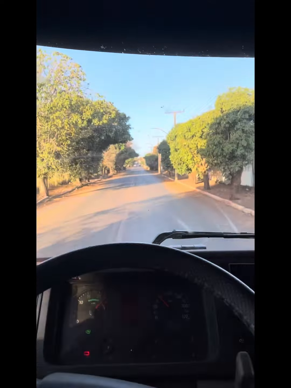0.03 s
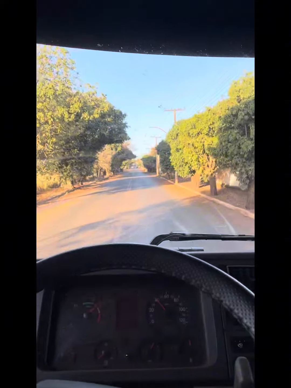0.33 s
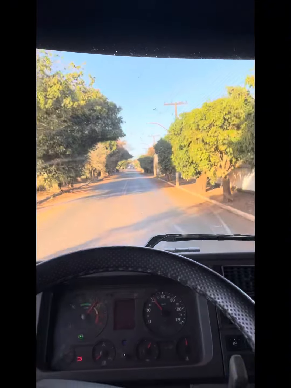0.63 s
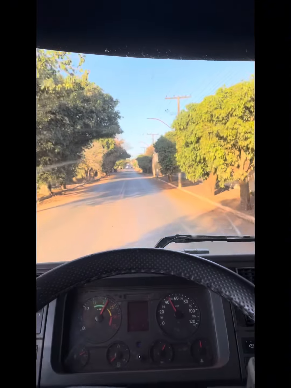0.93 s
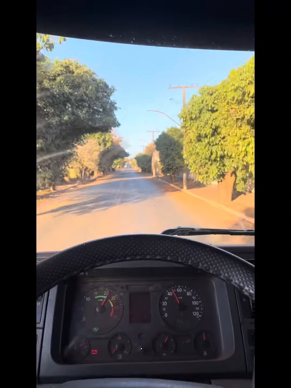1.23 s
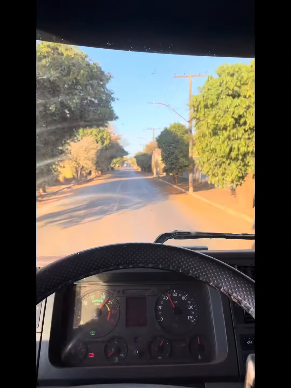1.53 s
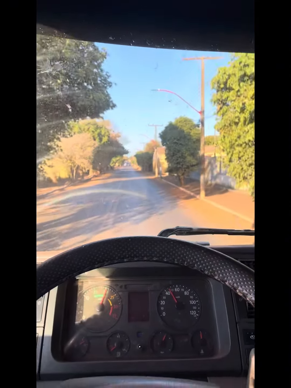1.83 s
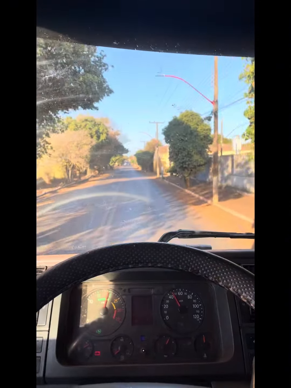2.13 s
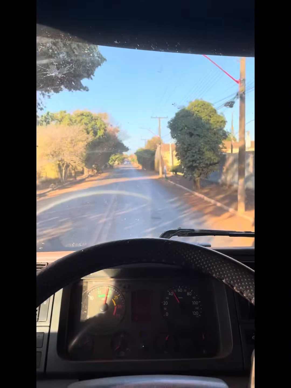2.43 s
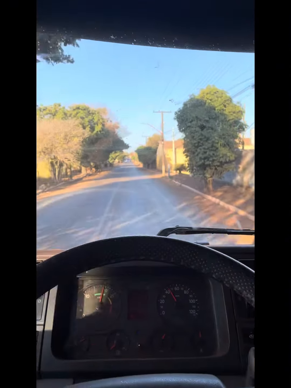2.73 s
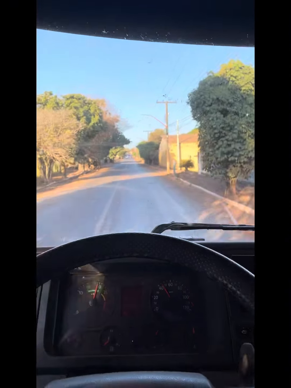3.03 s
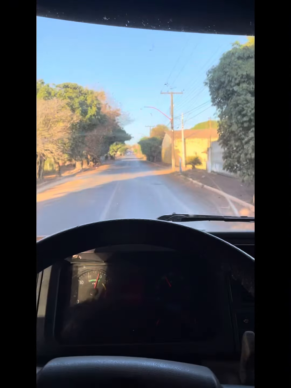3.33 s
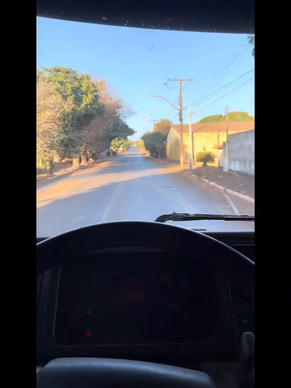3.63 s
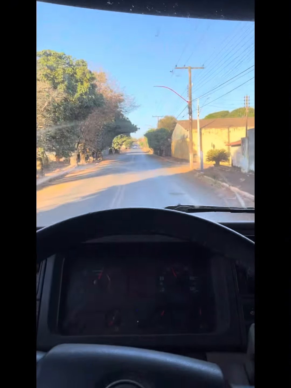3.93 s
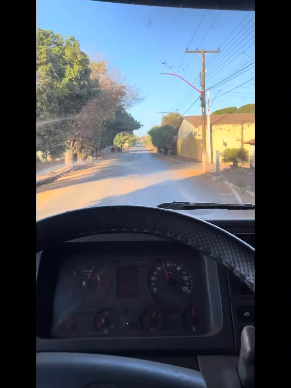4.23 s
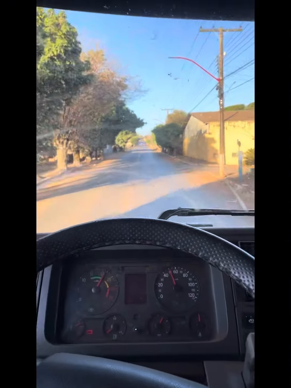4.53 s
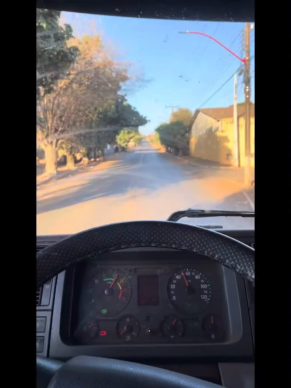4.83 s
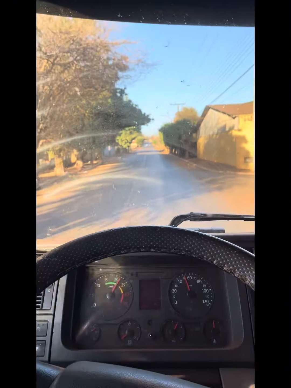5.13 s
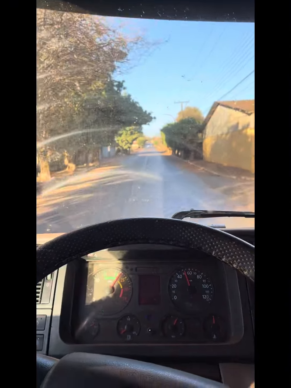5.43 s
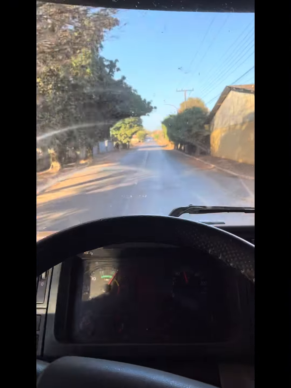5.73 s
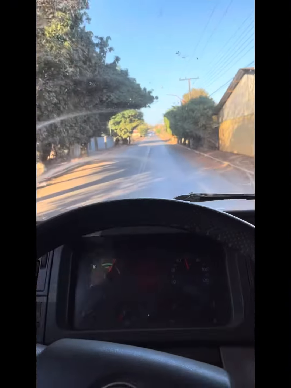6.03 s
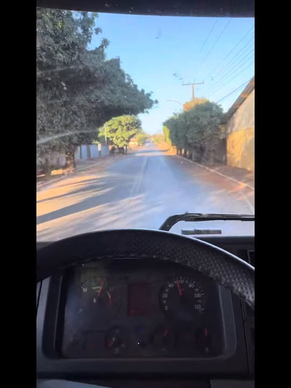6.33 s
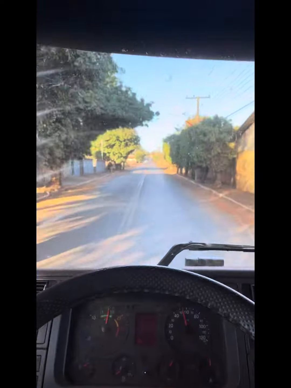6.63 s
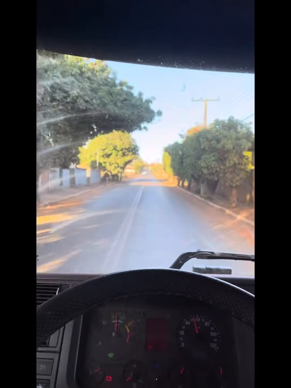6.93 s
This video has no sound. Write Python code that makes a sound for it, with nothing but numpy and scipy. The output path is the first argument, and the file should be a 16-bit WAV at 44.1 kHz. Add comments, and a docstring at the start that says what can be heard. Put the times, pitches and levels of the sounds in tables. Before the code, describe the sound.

Inside a moving truck's cab, a loud diesel drone sits over low road rumble. After a quick rev and a hiss from an air valve, the engine digs in, growling and slowly rising in pitch while panels buzz. Bumps thud through the floor, the hardest just as the driver eases off. The engine coasts down, then picks up again at a lower pitch. Faint trim squeaks and a thin turbo whistle come and go.

```python
"""A diesel drone over road rumble, heard from the driver's seat of a six-cylinder truck. The engine is blipped
through a gear change, pulls hard for over three seconds, coasts and pulls again in a higher gear. Periodic
firing makes the exhaust boom and growl through the cab's air resonances; combustion rattles the block, intake
air rushes and the turbo whistles faintly. Rubbing trim squeaks, air valves spit, bumps jolt the floor, the
driveline clunks at a gear change, and short buzzing rattles come during the pull and as the throttle lifts."""
import sys
import numpy as np
from scipy import signal
from scipy.fft import rfft, irfft
from scipy.io import wavfile
from scipy.ndimage import uniform_filter1d, minimum_filter1d

SR = 44100
rng = np.random.default_rng(int(sys.argv[2]) if len(sys.argv) > 2 else 0)


def master_out(mix):
    """Clip the mix to full scale and print it as 16-bit PCM to the path in sys.argv[1]."""
    frames = np.transpose(np.atleast_2d(mix))
    ceiling = np.clip(frames, -1, 1)
    pcm = np.round(ceiling * 32767).astype(np.int16)
    wavfile.write(sys.argv[1], SR, pcm)


N = 313110
TIME = np.arange(N) / SR
BINS = np.fft.rfftfreq(N, 1 / SR)

# Levels in the tables are relative. The engine fires three times per turn of the crank.
# trend of the engine's speed: t/s, firing rate/Hz
FIRING_RATE = [(0, 128), (.3, 113), (.8, 99), (.92, 105), (1.12, 124), (1.3, 126), (1.58, 98), (1.88, 92),
               (2.8, 99), (3.4, 103.4), (3.8, 105.8), (4.02, 108.1), (4.84, 112.4), (5.55, 113.4),
               (5.9, 98), (6.2, 82), (6.55, 74), (6.96, 91), (7.1, 90)]
# pedal presses: start/s, rise/s, lift/s, fall/s, load (0-1), exhaust push (0-1)
PEDAL_PRESSES = [(0, 0.003, 0.07, 0.072, 0.48, 0), (0.878, 0.042, 1.09, 0.3, 0.72, 0.81),
                 (1.428, 0.37, 4.997, 0.74, 0.94, 0.96), (6.589, 0.027, 6.92, 0.36, 0.63, 1)]
# loudness laws: coasting level/dB, then gain/dB per unit of load, charge, lugging and octave of speed
GROWL_LAW = (-37.5, 15, -0.5, 1, 0)
KNOCK_LAW = (-45, 4, 12.5, 2, 5.5)
RUSH_LAW = (-48, 6, 9, 6, 3)
# difference between the ears: f/Hz, side minus mid/dB
STEREO_WIDTH = [(100, -23.5), (210, -9.5), (310, -2), (440, -10), (570, 0), (700, 12), (860, 18),
                (1100, 10), (1450, 3.5), (2200, -2.5), (5200, -6.5), (6500, -0.5), (7600, 37.5), (9000, -5)]
# the cab's boom under load: firing rate/Hz, fundamental/dB, octave/dB
BOOM_BY_SPEED = [(73, -15.5, -27.5), (90.3, -11, -23), (92.6, -15.5, -23), (95, -13, -21), (96.5, -17, -16),
                 (101, -16, -22.5), (103.3, -16.5, -16), (106, -15.5, -16.5), (109.5, -14.7, -20),
                 (113, -15, -18), (129, -15, -15)]
# strong upper exhaust orders: multiple of the crank's rate, level/dB
EXHAUST_ORDERS = [(9, 4.5), (10, 5.5), (11, 1), (12, 5.5), (13, 0.5), (14, 2.5), (15, 0.5), (16, 0.5),
                  (17, -2.5), (18, -11), (19, -1.5), (20, 2), (22, -2), (23, 0.5), (24, -3), (25, 3),
                  (26, 1.5)]
# air resonances of the cab: f/Hz, width/Hz, gain/dB
CAB_MODES = [(441.3, 28.5, 7.5), (561.7, 17, 5.5)]
# swells and dips of the growl in two bands: t/s, lower gain/dB, upper gain/dB
DRONE_GAINS = [(1.6, -2.5, -2.5), (2.45, 0.5, -2.5), (2.678, 0.5, 10), (2.9, 3, -1.5), (3.35, 1.5, -1.5),
               (3.55, 4, 7), (3.75, -1, 0), (3.9, -3.5, -10), (4.05, 3.5, -4.5), (4.3, -2.5, 1.5),
               (4.45, -2.5, -6), (4.7, 1.5, -2), (5, -0.5, -2.5), (6.6, -2, -3.5)]
DRONE_BANDS = [(445, 60), (582, 79)]  # f/Hz, width/Hz
# ringing engine covers: f/Hz, half-width/Hz, level/dB, share of COVER_BUZZ (0-1)
COVER_MODES = [(941, 35, -15.5, 0.22), (1418, 38, -15.5, 0.52), (1730, 29, -21.5, 0.7),
               (2240, 120, -17, 0.77)]
# the turbo winding down and up: t/s, whistle f/Hz, whistle level/dB, shaft level/dB
TURBO_PATH = [(0, 14700, -100, -62), (.33, 12300, -86, -50), (.46, 11400, -69, -57), (.63, 10400, -65, -48),
              (.85, 9450, -64, -68), (1.2, 11500, -63, -60), (1.56, 9600, -64, -62), (2.3, 12800, -64, -48),
              (2.5, 13400, -90, -50), (3.2, 15150, -82, -41), (5.1, 15400, -82, -42),
              (5.35, 14850, -100, -38), (5.52, 13000, -88, -44), (5.7, 11700, -66, -44),
              (5.88, 11100, -72, -56), (6.15, 9500, -74, -66), (7.1, 9600, -77, -66)]

# level envelopes: t/s, level/dB
GROWL_STRAIN = [(0, -19), (1, 4.5), (1.6, 3), (1.95, 6.5), (2.15, 10.5), (2.33, 11), (2.5, 11.5), (2.65, 6),
                (2.9, 2), (3.5, 0.5), (4.5, 7), (5.3, 4), (7.1, 4)]  # hard edge and gas noise of the growl
GROWL_LUMPS = [(1.68, 4.5), (1.78, -0.5), (1.92, 1.5), (1.97, -1.5), (2.12, -1.5), (2.19, 1.5), (2.24, -3),
               (2.32, 4), (2.45, -0.5), (2.55, -1), (2.9, 0)]  # unevenness while the engine lugs
COVER_BUZZ = [(0, -5), (2, -18), (2.15, 19), (2.25, 6), (2.35, 8), (2.55, 10), (2.9, -15), (3.4, 15),
              (3.6, 2), (4.1, 16.5), (4.45, -7), (4.75, 16.5), (5.05, 8.5), (5.35, 23), (6, -2)]
RUSH_SWELLS = [(3.2, -0.5), (3.38, 2.5), (3.52, -.5), (3.68, 2), (3.85, -1), (4.1, 0.5), (4.25, 1.5),
               (4.55, -2), (5, 0.5), (6.7, -1.5)]
ROAD_ROUGHNESS = [(0, -29.5), (.3, -30), (.5, -25), (.9, -24), (1.8, -30), (2.3, -29.5), (2.7, -29),
                  (3.5, -30.5), (3.95, -27), (4.9, -26), (5.3, -25.5), (6.05, -27), (6.65, -30),
                  (7.1, -28.5)]

# spectral envelopes: f/Hz, level/dB
THIRD_RESPONSE = [(225, -40), (250, -12), (270, -17), (292, -21), (345, -58), (375, -7), (390, -3)]  # how the cab carries the firing note's third harmonic
FLUTTER_SPECTRUM = [(45, -27), (75, 23.5), (115, 13.5), (150, 16), (260, -71)]
BURBLE_SPECTRUM = [(110, -11), (170, 11), (230, 20), (280, -14), (400, -54)]
GROWL_SPECTRUM = [(15, -42), (45, -2), (130, 5.5), (180, -1.5), (260, -2), (305, -13), (380, -3.5),
                  (470, 2), (570, 2.5), (650, -7), (740, -11.5), (830, -21), (950, -19.5), (1150, -19.5),
                  (1800, -20.5), (4000, -90)]
EDGE_SPECTRUM = [(500, -43), (600, -10.5), (740, -5.5), (860, 1.5), (1000, 5.5), (1130, -8),
                 (1330, -2.5), (1700, -16.5)]
KNOCK_SPECTRUM = [(600, -25), (950, -6), (1180, 0), (1420, 0.5), (1950, 3.5), (2300, 1.5), (2700, 1.5),
                  (3300, -10.5), (6000, -55), (12000, -102)]
RUSH_SPECTRUM = [(1200, -8), (2600, 2.5), (3300, 3.5), (4500, 1.5), (5300, 2), (6100, -4.5), (6900, -10),
                 (7600, -113), (8700, -12.5), (10500, -16.5), (12000, -26.5), (13200, -44), (14000, -61)]
RUMBLE_SPECTRUM = [(14, -40), (24, -18), (33, -2), (55, -4.5), (75, -2), (110, -12.5), (170, -23),
                   (300, -26), (600, -41), (1200, -111)]
TYRE_SPECTRUM = [(100, -27), (300, 7.5), (620, 2.5), (760, 4), (860, -12), (1020, -0.5), (1700, -15),
                 (3000, -19), (6000, -51), (7600, -46), (9000, -19.5), (11500, -24), (13500, -61),
                 (15000, -88)]
SPIT_SPECTRUM = [(1200, -13), (3000, 3.5), (5500, 3.5), (7600, -13), (9500, 1), (12000, -10), (14000, -34),
                 (16000, -46.5)]
FLOOR_SPECTRUM = [(30, -26), (70, 5.5), (190, -2.5), (250, -7.5), (330, -8.5), (700, -68), (3000, -130)]
RATTLE_SPECTRUM = [(1100, -38), (1450, -18), (1750, 3), (2150, -3), (2600, -6), (3300, -14), (6000, -56)]

# squeaks of the cab trim: t/s, f/Hz, duration/s, level/dB
TRIM_SQUEAKS = [(0.023, 5760, 0.052, -52), (0.696, 11800, .022, -44.5), (0.747, 10600, .035, -49.5),
                (1.118, 11700, 0.046, -49), (1.146, 10550, 0.039, -42), (1.729, 10900, .033, -50),
                (2.538, 1370, 0.049, -32), (2.953, 1390, 0.097, -36.5), (3.31, 10600, 0.046, -45),
                (4.585, 10600, 0.035, -50), (5.403, 8850, 0.013, -48.5), (5.434, 5760, 0.13, -52.5),
                (5.565, 11600, 0.022, -45), (5.763, 11700, 0.032, -45), (5.928, 12300, 0.039, -52),
                (5.977, 11200, 0.027, -47), (6.06, 11000, 0.046, -54), (6.307, 6350, 0.08, -52),
                (6.334, 3300, 0.074, -53), (6.515, 10600, 0.024, -49), (6.716, 10660, 0.032, -41),
                (6.98, 11400, .028, -48)]
# air valves venting at the gear changes: t/s, duration/s, level/dB
VALVE_SPITS = [(0.85, 0.042, -39.5), (1.012, 0.04, -31), (5.78, 0.097, -39.5), (5.949, 0.054, -37.5),
               (6.474, .07, -50)]
# jolts of the cab from road bumps, and a driveline clunk at the gear change near 6 s: t/s, floor level/dB,
# floor 60 dB decay time/s, panel level/dB, panel f/Hz
CAB_JOLTS = [(0.928, -22, .08, -21, 524), (1.341, -11.5, 0.089, -33, 300), (3.848, -15, .35, -28, 300),
             (3.895, -12, 0.32, -22, 330), (4.893, -11.5, 0.91, -8.5, 470), (4.944, -16, .25, -10.5, 680),
             (5.975, -23, 0.23, -25, 520), (6.637, -14, 0.056, -24, 540)]
# short buzzing rattles during the pull and as the throttle lifts: t/s, duration/s, level/dB
RATTLES = [(2.1, .1, -41), (3.322, 0.15, -32.5), (3.983, 0.12, -33), (4.2, 0.085, -37), (4.483, .18, -41),
           (4.66, 0.17, -33), (5.05, 0.58, -36)]


def amp(db):
    """Amplitude ratio: tenfold for every 20 dB."""
    return 10 ** (np.asarray(db) / 20)


def unit(x):
    """Normalisation to rms 1."""
    return x / np.sqrt(np.mean(x ** 2) + 1e-20)


def curves(rows):
    """Linear interpolation of each column of a time table, sample by sample."""
    times, *columns = np.transpose(rows)
    return [np.interp(TIME, times, column) for column in columns]


def colour(points):
    """Spectral envelope: gain at every bin, interpolated in dB over log frequency."""
    hz, db = np.transpose(points)
    return amp(np.interp(np.log(BINS + 1), np.log(hz), db))


def drift(hz, size=16384):
    """Random modulation of rms 1, up to about the given rate."""
    return unit(np.interp(2 * hz * TIME, np.arange(size), rng.standard_normal(size)))


def noise():
    """Two uncorrelated white noises."""
    return rng.standard_normal((2, N))


def add(mix, start, sound):
    """Superposition of a sound on the mix at a given time."""
    part = mix[max(round(start * SR), 0):][:len(sound)]
    part += sound[:len(part)]


def in_cab(pair, gain, direct=0.99):
    """Interaural difference: filtered direct sound leads at the left; reflections are uncorrelated."""
    mid, reflected = rfft(pair) * gain
    side = colour(STEREO_WIDTH) * (1j * direct * mid + np.sqrt(1 - direct ** 2) * reflected)
    return irfft(np.array([mid + side, mid - side]), N) / np.std(irfft(mid, N))


def shudder(clutch_s=1.49, period_s=.3, swing_hz=7, decay_s=.65):
    """Damped oscillation: the driveline rocks the firing rate after the clutch bites."""
    age = np.maximum(TIME - clutch_s, 0)
    return -swing_hz * np.exp(-age / decay_s) * np.sin(2 * np.pi * age / period_s)


def pedal(push_lead=1.08):
    """Trapezoidal envelopes of engine load and exhaust push; the push peaks slightly sooner."""
    load, push = np.zeros((2, N))
    for start, rise, lift, fall, depth, push_depth in PEDAL_PRESSES:
        up, down = (TIME - start) / rise, 1 - (TIME - lift) / fall
        load += depth * np.clip(np.minimum(up, down), 0, 1)
        push += push_depth * np.clip(np.minimum(push_lead * up, down), 0, 1)
    return load, push


def spool(load, lag_s=.4, start_boost=.95):
    """First-order lag: the turbo's boost trails the load."""
    memory = np.exp(-1 / (lag_s * SR))
    return signal.lfilter([1 - memory], [1, -memory], load, zi=[start_boost])[0]


def effort(speed, load, boost, lug_below_hz=100.1, lug_range_hz=3.3):
    """Gains add in decibels: levels of growl, knock and rush from load, boost and speed."""
    charge = boost * load ** 0.66
    lug = charge * np.clip((lug_below_hz - speed) / lug_range_hz, 0, 1)
    octaves = np.log2(speed / 100)
    return [coast + by_load * load + by_charge * charge + by_lug * lug + by_speed * octaves
            for coast, by_load, by_charge, by_lug, by_speed in (GROWL_LAW, KNOCK_LAW, RUSH_LAW)]


def cycle_wave(firings, crank_db, firing_db, size=8192, count=170):
    """Fourier series of the six-firing cycle, with separate gains for crank and firing orders."""
    k = np.arange(count)
    height = amp(crank_db * (k % 2 == 0) + firing_db * (k % 6 == 0))
    height[[0, 6, 12]] = 0  # the firing note and its octave belong to the boom
    shapes = irfft(height * np.exp(2j * np.pi * rng.random((2, count))), size)
    place = firings / 6 % 1 * size
    return unit(np.array([np.interp(place, np.arange(size), shape, period=size) for shape in shapes]))


def bursts(firings, depth, uneven_db, chance_db):
    """Amplitude modulation: a swell at every firing, its strength set by cylinder and by chance."""
    number = firings.astype(int)
    cylinder = np.array([1, .1, .5, -1, .2, -.8])[number % 6]
    strength = amp(uneven_db * cylinder + chance_db * rng.standard_normal(size=1024)[number])
    pulse = 1 + depth * np.exp(-(firings % 1) / 0.26)
    return unit(uniform_filter1d(strength * pulse, size=30))


def boom_levels(speed, swing, push, coast_note_db=-26, coast_octave_db=-30):
    """Forced response: the push lifts firing note and octave to the cab's levels for that speed."""
    hz, note_db, octave_db = np.transpose(BOOM_BY_SPEED)
    loaded_note_db = np.interp(speed, hz, note_db) - 1.06 * swing  # each dip in speed swells the note
    loaded_octave_db = np.interp(speed, hz, octave_db)
    return (coast_note_db + push * (loaded_note_db - coast_note_db),
            coast_octave_db + push * (loaded_octave_db - coast_octave_db))


def boom(firings, clean, note_db, octave_db):
    """Harmonics of the firing rate: clean tones under throttle, a loose flutter when coasting."""
    tonal, loose = clean * np.sqrt(2), np.sqrt(1 - clean ** 2)
    phase = 2 * np.pi * firings
    note = tonal * np.sin(phase) * (1 + 0.022 * drift(25))
    octave = tonal * np.sin(2 * phase + 1) * (1 + 0.11 * drift(21))
    third = tonal * irfft(rfft(np.sin(3 * phase + 2)) * colour(THIRD_RESPONSE), N)
    flutter = in_cab(noise(), colour(FLUTTER_SPECTRUM))
    burble = in_cab(noise(), colour(BURBLE_SPECTRUM))
    shake = amp(-17.5) * tonal * np.sin(phase / 3)  # once per turn of the crank
    low = amp(note_db) * (note * amp([[-.7], [.7]]) + third + shake + 0.32 * loose * flutter)
    return low + amp(octave_db) * (octave * amp([[-1.9], [1.7]]) + 0.25 * loose * burble)


def growl(firings, clean, level_db):
    """Source and filter: upper exhaust orders and pulsed gas noise excite the cab's air resonances."""
    crank = 2 * np.pi * (firings + .011 * drift(22)) / 3
    phases = 2 * np.pi * rng.random((len(EXHAUST_ORDERS), 2, 1))
    strong = unit(sum(amp(db + 2 * drift(4)) * np.sin(order * crank + phase)
                      for (order, db), phase in zip(EXHAUST_ORDERS, phases)))
    weak = cycle_wave(firings + .012 * drift(22), crank_db=4, firing_db=1)
    gas = noise() * bursts(firings, depth=.45, uneven_db=1.5, chance_db=2)
    strain = amp(curves(GROWL_STRAIN)[0])
    # throttle brings out the pitch; coasting and strain bring out the rough gas noise
    drive = clean * (.68 * strong + .6 * weak) + (3.4 - 2.6 * clean) * strain ** .4 * gas
    modes_db = sum(db / (1 + (2 * (BINS - hz) / width) ** 2) for hz, width, db in CAB_MODES)
    sound = in_cab(drive, colour(GROWL_SPECTRUM) * amp(modes_db), direct=0.93)
    edge = irfft(rfft(sound) * colour(EDGE_SPECTRUM), N)
    return amp(level_db) * amp([[.8], [-.8]]) * (sound + (strain - 1) * edge)


def drone(sound):
    """Time-varying filter: the growl swells and dips in two bands, near 445 and 580 Hz."""
    spectrum = rfft(sound)
    for db, (hz, width) in zip(curves(DRONE_GAINS), DRONE_BANDS):
        band = irfft(spectrum / (1 + (2 * (BINS - hz) / width) ** 4), N)
        sound = sound + (amp(db) - 1) * band
    return sound


def knock(firings, level_db):
    """Impulsive excitation: each combustion rattles the block, and each cover rings in its own fits."""
    orders = cycle_wave(firings + .003 * drift(20), crank_db=3, firing_db=2)
    rattle = noise() * bursts(firings, depth=.4, uneven_db=-0.15, chance_db=0.4) + 0.33 * orders
    clatter = in_cab(rattle, colour(KNOCK_SPECTRUM), direct=1)
    buzz_db = curves(COVER_BUZZ)[0]
    for hz, half_width, db, share in COVER_MODES:
        ring = in_cab(rattle, 1 / (1 + ((BINS - hz) / half_width) ** 2), direct=0.5)
        clatter += amp(db + share * buzz_db + 3 * drift(9) - .5) * ring
    return amp(level_db - 3.7 + .8 * drift(9)) * amp([[.5], [-.5]]) * clatter


def rush(firings, level_db):
    """Flow noise of intake and fan air, throbbing slightly with the cylinders."""
    air = noise() * bursts(firings, depth=0.24, uneven_db=1, chance_db=.9)
    whirr = cycle_wave(firings + 0.0071 * drift(30), crank_db=-23, firing_db=-8, count=400)
    return amp(level_db) * in_cab(air + 0.19 * whirr, colour(RUSH_SPECTRUM), direct=0.79)


def whistle(hz, db, spread, flutter_hz):
    """Narrow-band noise: random modulation broadens a gliding tone into a breathy one."""
    phase = 2 * np.pi * np.cumsum(hz * (1 + spread * drift(230))) / SR
    return amp(db) * (drift(flutter_hz) * np.sin(phase) + drift(flutter_hz) * np.cos(phase))


def turbo(shaft_ratio=.146):
    """Rotor tones: the blades' thin whistle and the shaft's hum glide with the wheel's speed."""
    hz, blades_db, shaft_db = curves(TURBO_PATH)
    blades = whistle(hz, blades_db + 3.5 * drift(14) - 2, spread=.011, flutter_hz=130)
    shaft = whistle(shaft_ratio * hz, shaft_db + 2 * drift(12), spread=.032, flutter_hz=60)
    return blades + shaft


def road():
    """Structure-borne noise: the rough road rumbles through the chassis, with a faint wash of tyres."""
    rumble = amp(curves(ROAD_ROUGHNESS)[0] + 5) * in_cab(noise(), colour(RUMBLE_SPECTRUM))
    flicker = amp(1.5 * drift(24))
    return rumble + amp(-42) * flicker * in_cab(noise(), colour(TYRE_SPECTRUM))


def squeaks():
    """Friction: trim rubs in brief, unsteady chirps that catch quickly and sag in pitch."""
    chirps = np.zeros(N)
    waver, grip = drift(570), amp(3.5 * drift(140))
    for start, hz, length, db in TRIM_SQUEAKS:
        progress = np.linspace(0, 1, int(length * SR))
        pitch = hz * (1 + .025 * (.5 - progress) + 0.016 * waver[int(start * SR):][:len(progress)])
        envelope = np.sin(np.pi * progress ** 0.92) ** 0.78
        add(chirps, start, amp(db) * envelope * np.sin(2 * np.pi * np.cumsum(pitch) / SR))
    return 2 * grip * np.array([chirps, np.roll(chirps, shift=1)])


def spits():
    """Jet noise: compressed air leaves the valves in sputtering hisses that rise fast and fall slower."""
    sputter = unit(amp(0.82 * drift(330)))
    envelope = sum(amp(db) * np.sin(np.pi * np.clip((TIME - start) / length, 0, 1) ** .5) ** 2
                   for start, length, db in VALVE_SPITS)
    return envelope * sputter * in_cab(noise(), colour(SPIT_SPECTRUM), direct=0.95)


def bumps(size=49152, floor_rise_s=.004, panel_rise_s=.003, panel_t60=.085, side_gain=.19):
    """Damped vibration: each jolt sets the cab's floor thudding and a loose panel knocking."""
    out = np.zeros((2, N))
    age, hz = np.arange(size) / SR, np.fft.rfftfreq(size, 1 / SR)
    floor = np.interp(hz, BINS, colour(FLOOR_SPECTRUM))
    for start, floor_db, floor_t60, panel_db, panel_hz in CAB_JOLTS:
        panel = 1 / (1 + ((hz - panel_hz) / (.38 * panel_hz)) ** 4)
        thud = unit(irfft(rfft(rng.standard_normal((2, size))) * floor))
        clunk = unit(irfft(rfft(rng.standard_normal((2, size))) * panel))
        thud *= amp(floor_db - 60 * age / floor_t60) * (1 - np.exp(-age / floor_rise_s))
        clunk *= amp(panel_db - 60 * age / panel_t60) * (1 - np.exp(-age / panel_rise_s))
        mid, side = thud + clunk
        add(out[0], start, mid + side_gain * side)
        add(out[1], start, mid - side_gain * side)
    return out


def rattles(firings):
    """Amplitude modulation: noise around 2 kHz, pulsed at the firing rate, buzzes in short rattles."""
    pulses = noise() * bursts(firings, depth=2, uneven_db=1.5, chance_db=1.5)
    envelope = sum(amp(db) * np.sin(np.pi * np.clip((TIME - start) / length, 0, 1))
                   for start, length, db in RATTLES)
    return envelope * in_cab(pulses, colour(RATTLE_SPECTRUM), direct=0.72)


def scene():
    """Superposition: layers locked to one crankshaft join the turbo, road, trim, valves and bumps."""
    trend, swing = uniform_filter1d(curves(FIRING_RATE)[0], size=2500), shudder()
    speed = trend + swing
    firings = np.cumsum(speed * (1 + .0022 * drift(10))) / SR  # running count
    load, push = pedal()
    clean = np.clip(.36 + .42 * push, 0, 1)  # weight of the exhaust's tones against its noise
    growl_db, knock_db, rush_db = effort(trend, load, spool(load))
    exhaust = boom(firings, clean, *boom_levels(speed, swing, push))
    exhaust += drone(growl(firings, clean, growl_db + curves(GROWL_LUMPS)[0]))
    engine = knock(firings, knock_db) + rush(firings, rush_db + curves(RUSH_SWELLS)[0]) + turbo()
    return exhaust + engine + rattles(firings) + road() + squeaks() + spits() + bumps()


def record(dry, ceiling=.92, cutoff_hz=15900):
    """Peak limiting eases the loudest moments down; a low-pass filter then limits the band."""
    gain = np.minimum(ceiling / (abs(dry).max(axis=0) + 1e-9), 1)
    limited = dry * uniform_filter1d(minimum_filter1d(gain, size=441), size=441)
    lowpass = signal.firwin(255, cutoff_hz, window=("kaiser", 9), fs=SR)
    return signal.oaconvolve(limited, lowpass[None], "same")


dry = scene()
out = record(dry)
master_out(out)
```